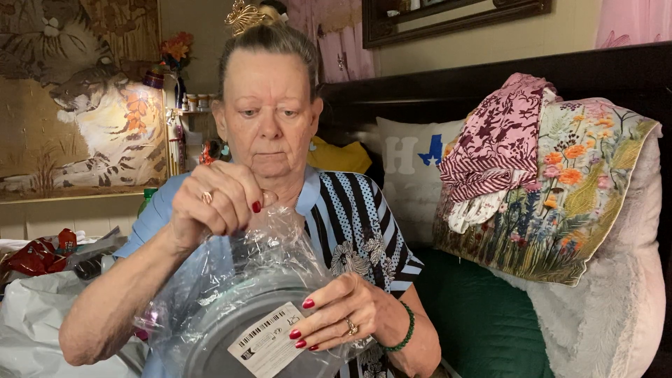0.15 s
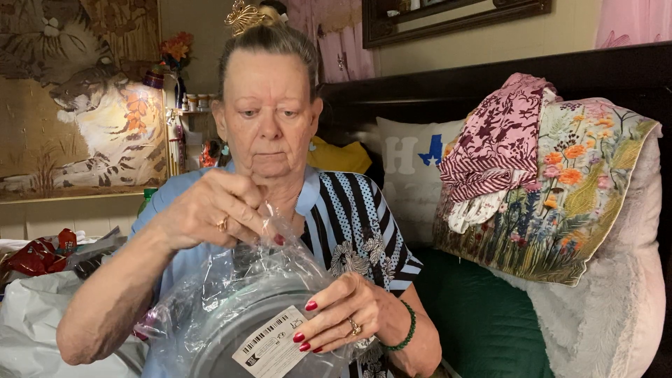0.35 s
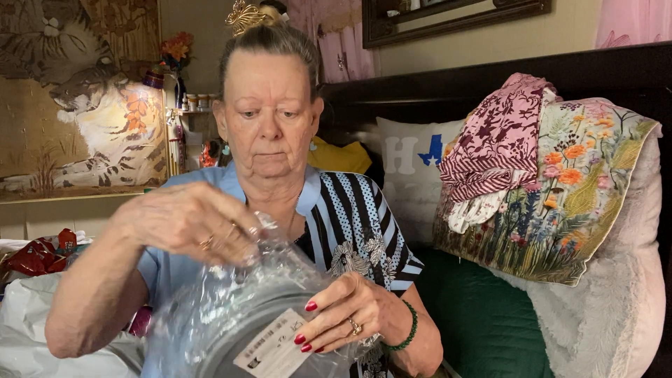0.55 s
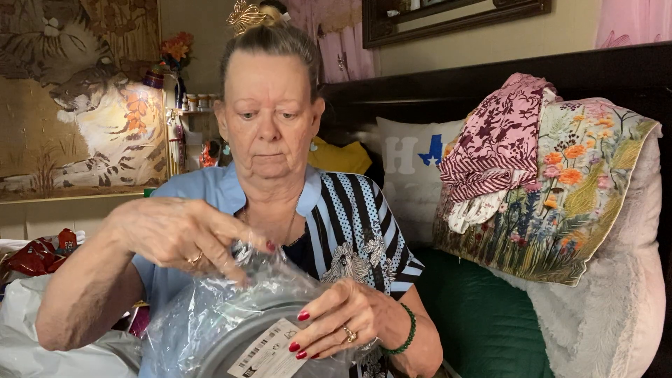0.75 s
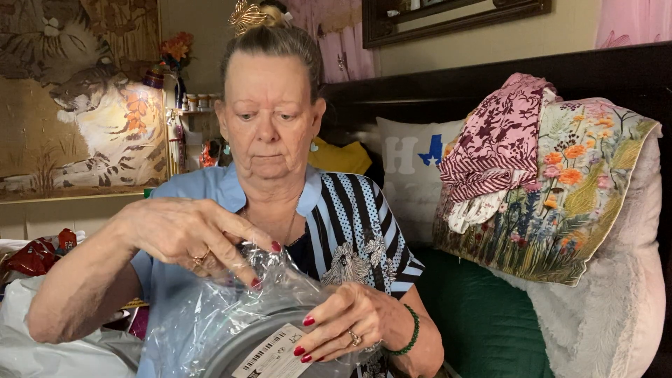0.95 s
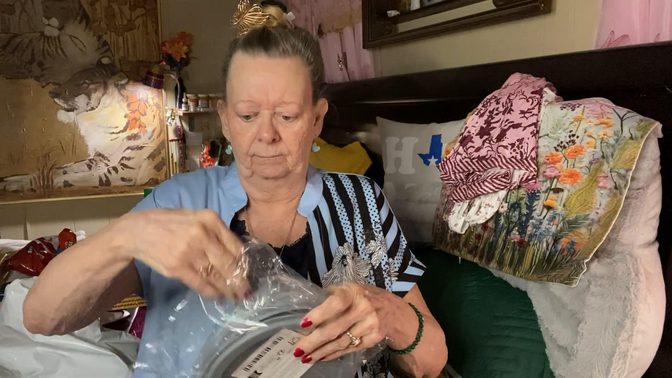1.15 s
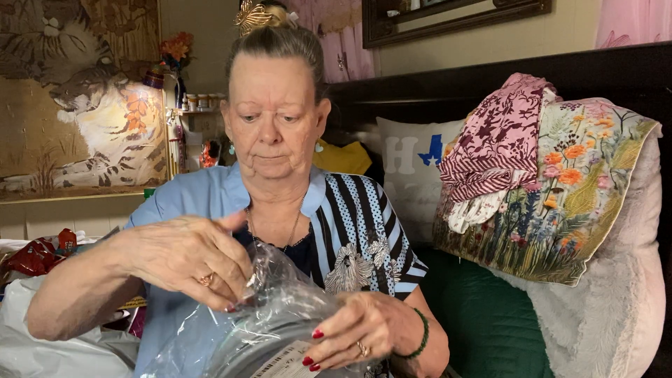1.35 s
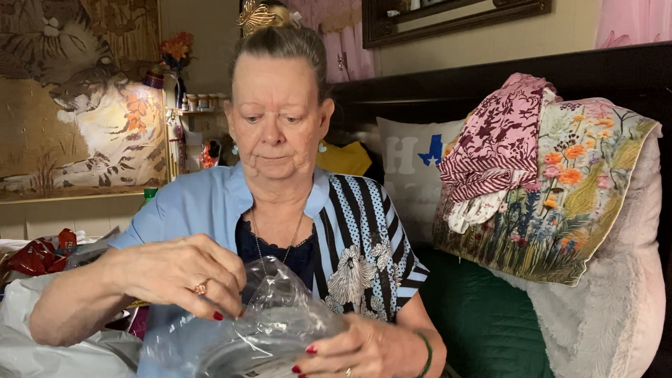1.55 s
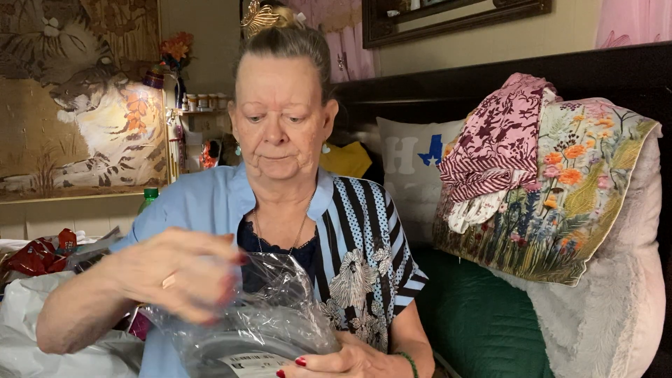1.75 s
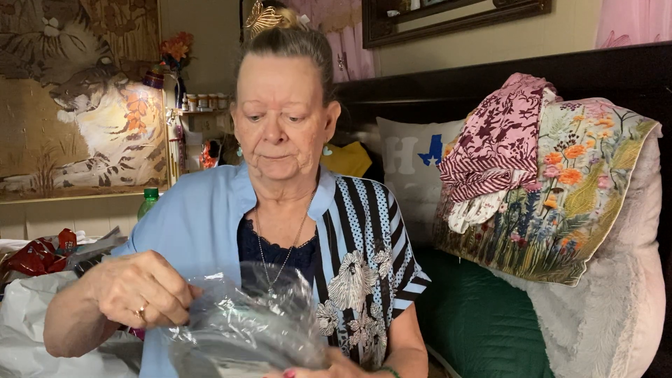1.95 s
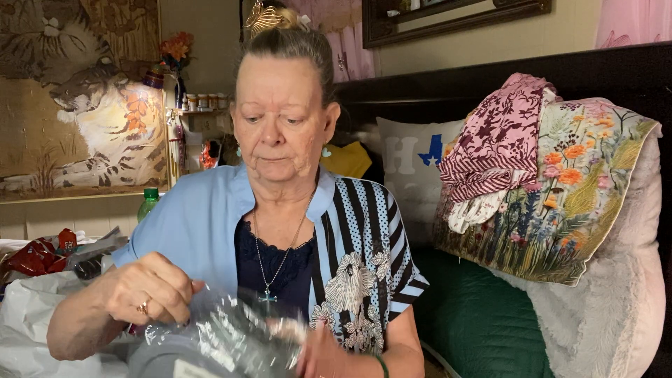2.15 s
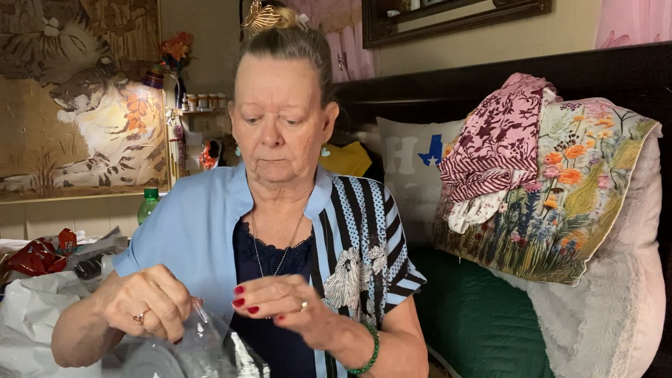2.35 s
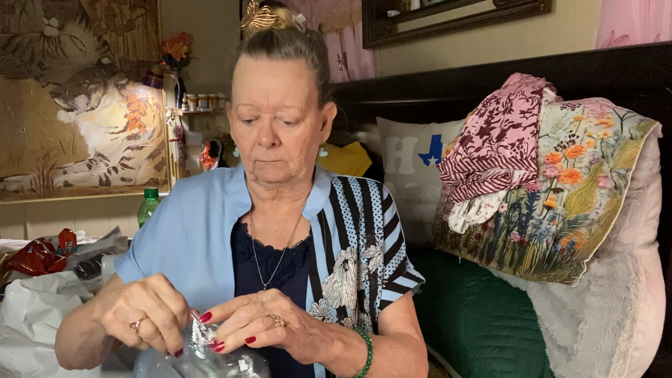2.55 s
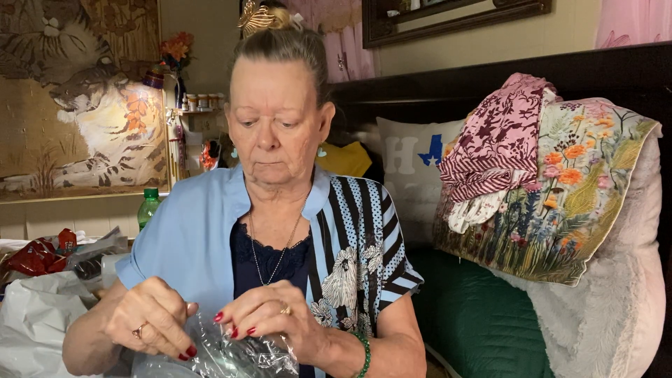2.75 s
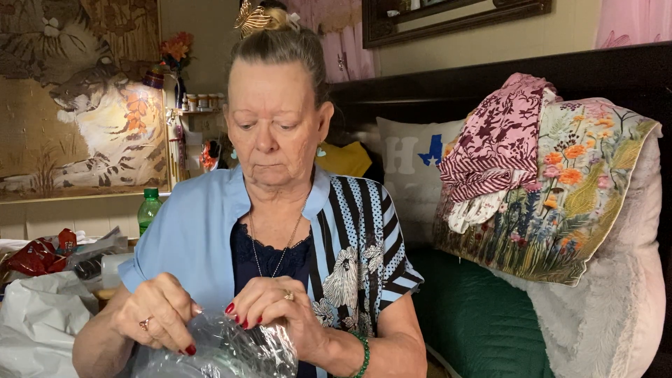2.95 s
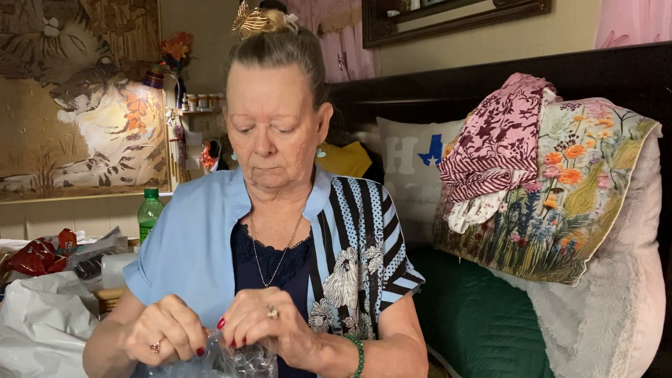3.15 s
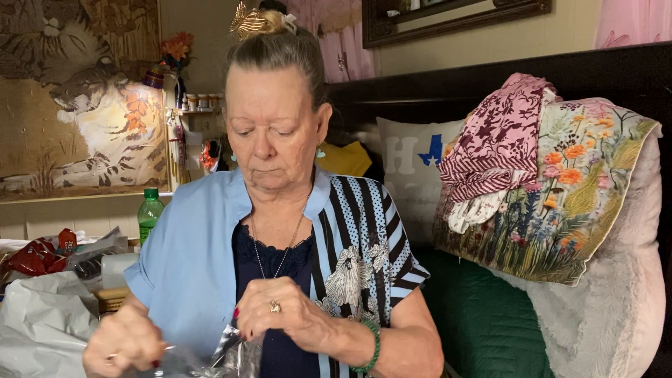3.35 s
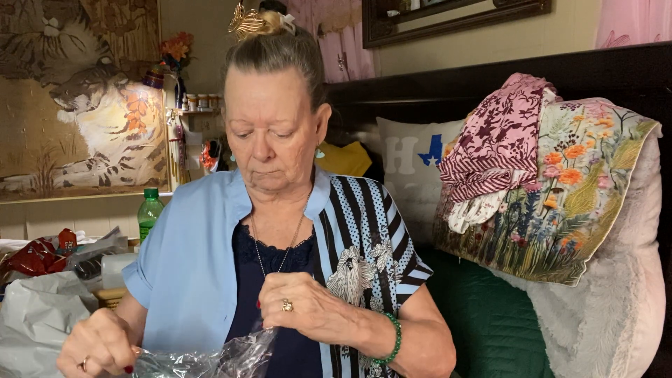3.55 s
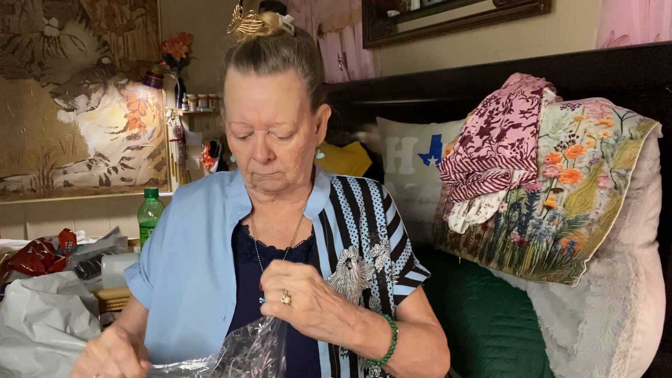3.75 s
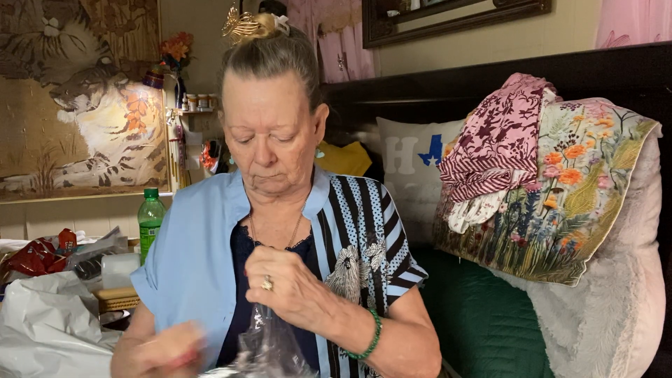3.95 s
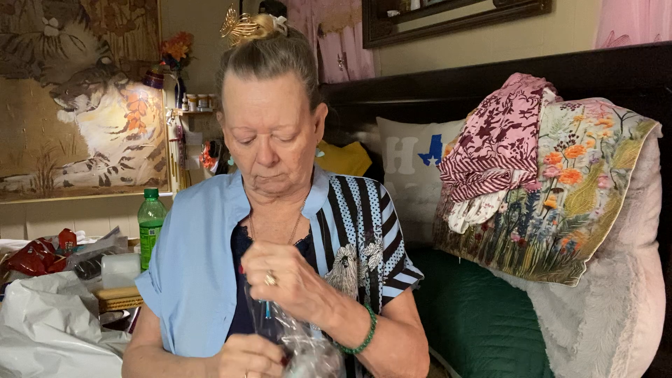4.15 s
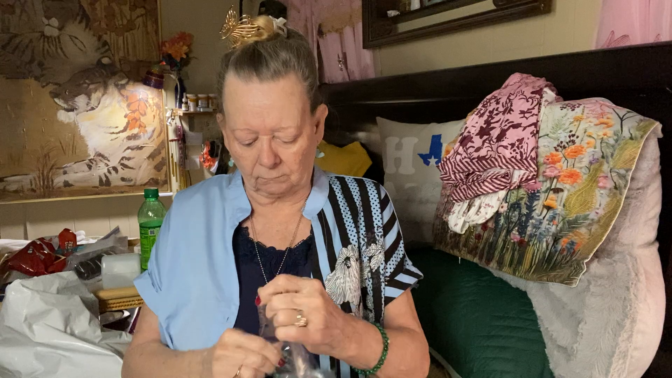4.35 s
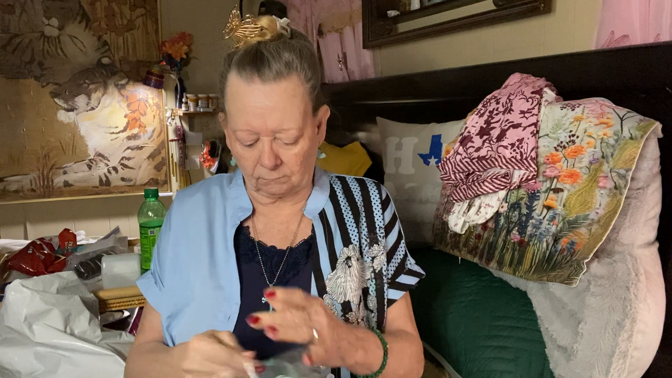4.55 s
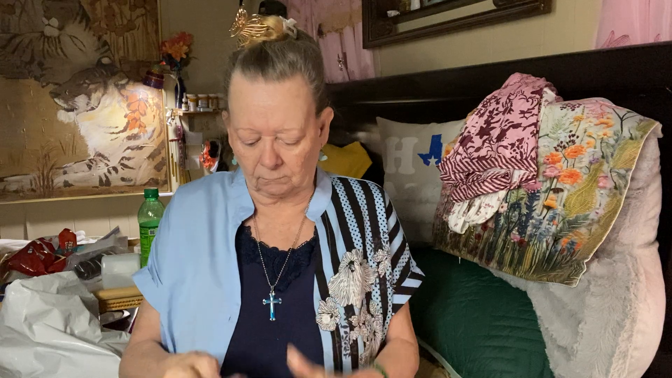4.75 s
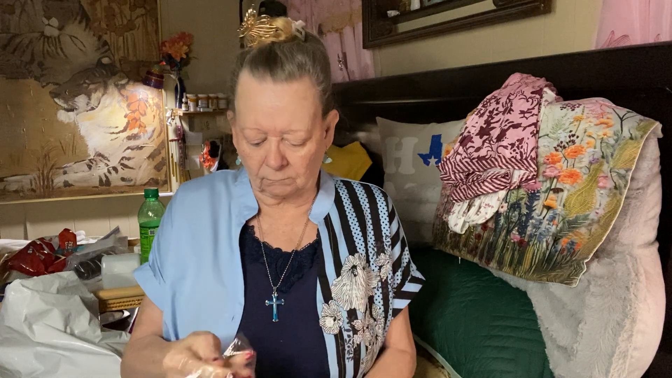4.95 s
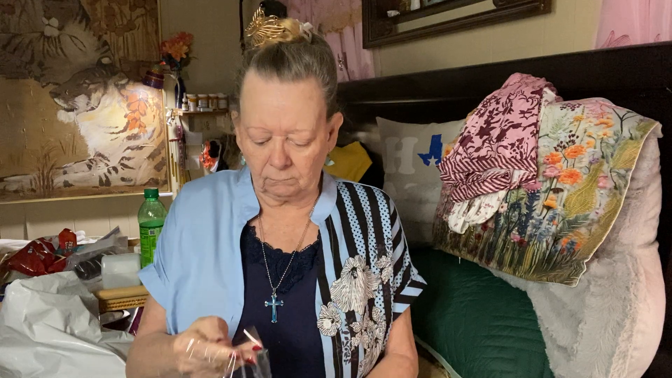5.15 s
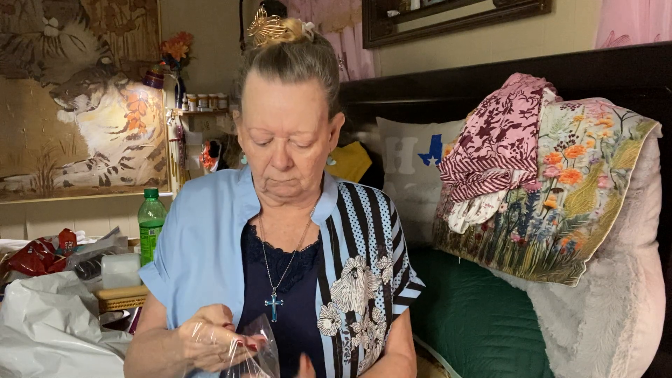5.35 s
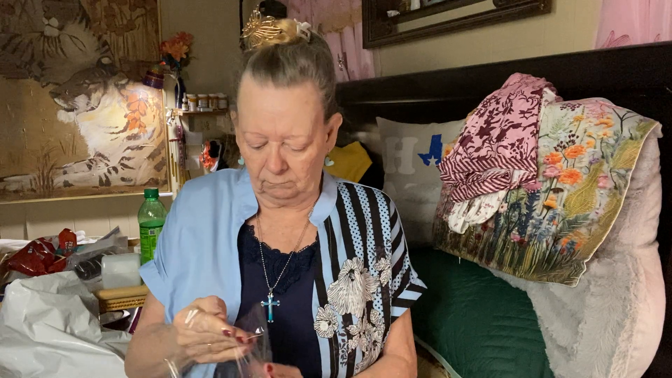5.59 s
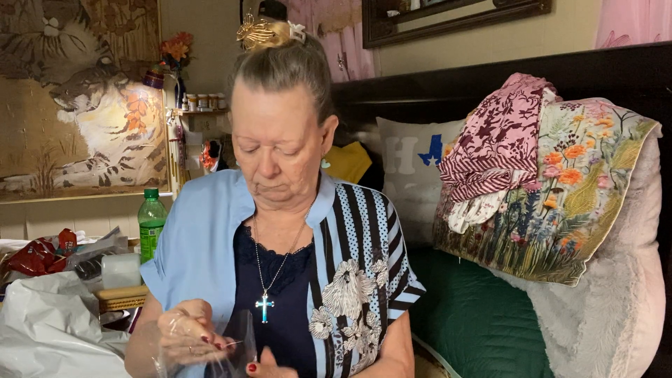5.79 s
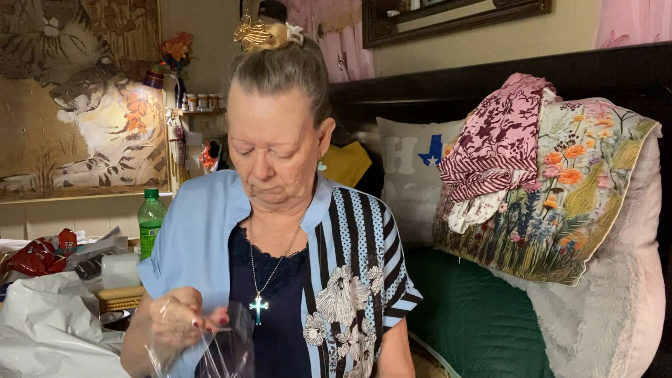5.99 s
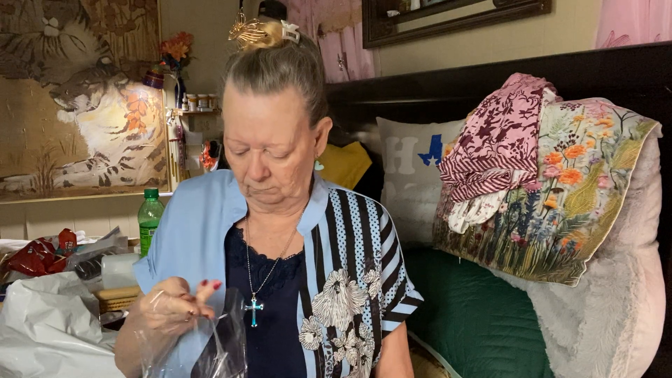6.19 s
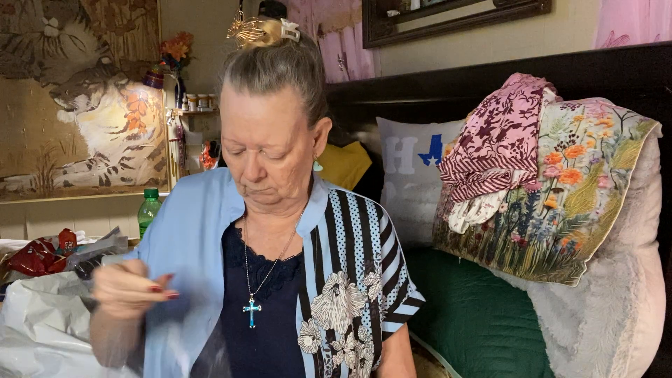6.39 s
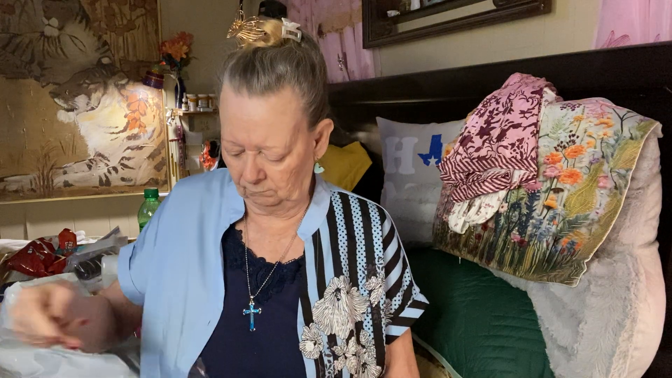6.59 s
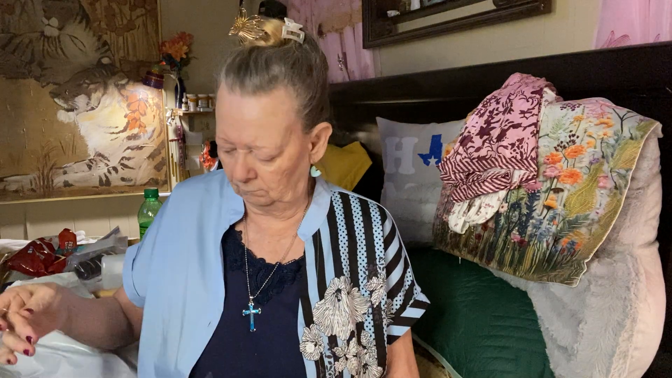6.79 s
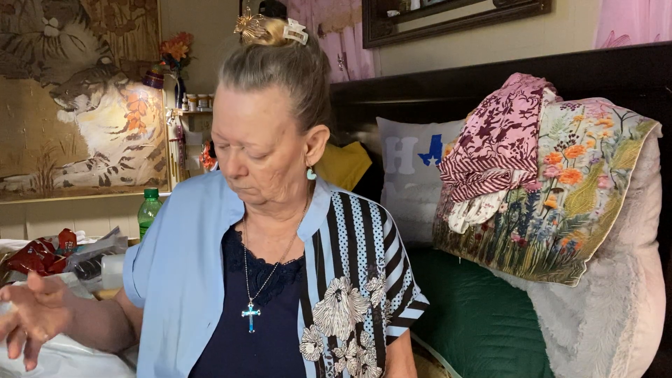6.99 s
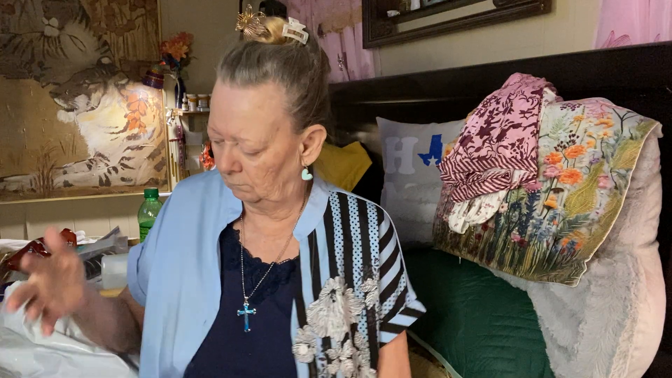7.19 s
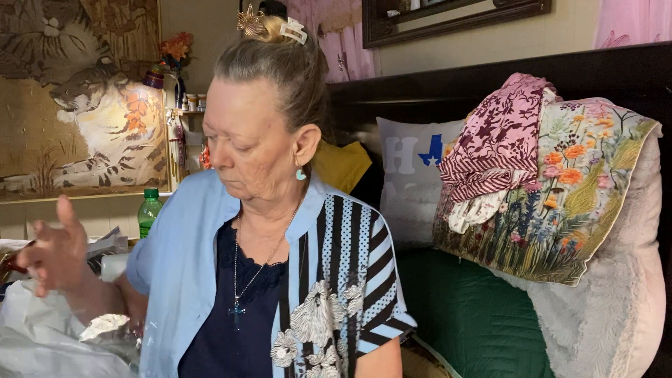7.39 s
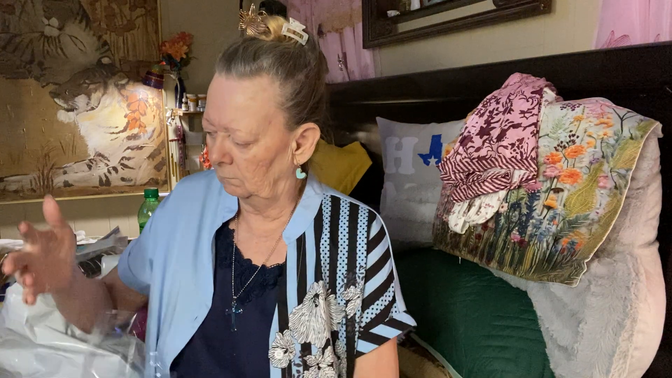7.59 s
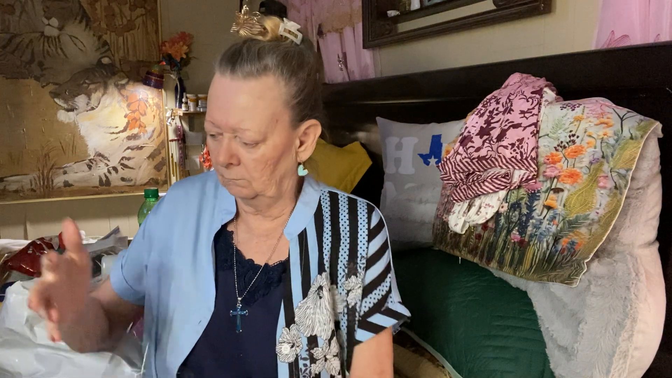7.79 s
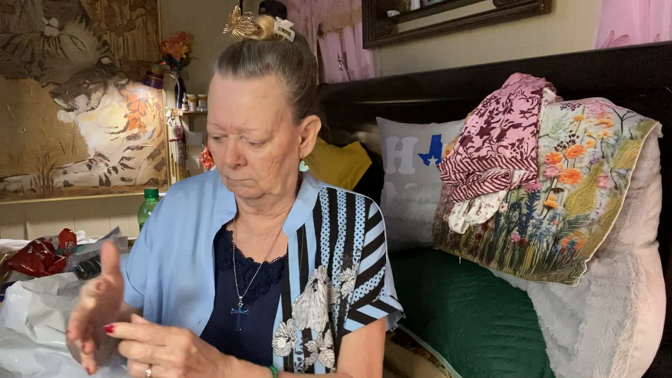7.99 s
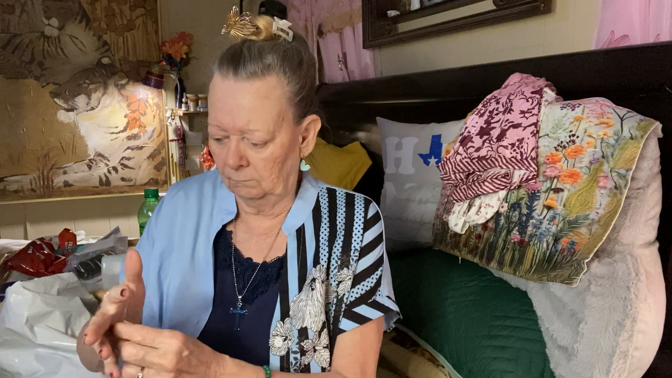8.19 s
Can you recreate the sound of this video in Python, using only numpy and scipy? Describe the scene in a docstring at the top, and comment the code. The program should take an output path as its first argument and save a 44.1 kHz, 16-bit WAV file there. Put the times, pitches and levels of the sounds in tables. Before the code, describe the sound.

Hands work crinkly plastic packaging with dense crackles and sharp snaps, soft thuds as contents are set down, one more loud crackle, then faint rustling.

```python
"""In a small furnished room, a phone lies close to a thin, stiff plastic bag, over quiet noise and faint mains hum.
From the start hands work it open: clicks swarm, ringing folds, slack sheet and air pocket, as cloth rubs dully.
Single creases snap in short noise bursts, panels knock hollowly, taut film rings and a gliding tone squeaks.
As the bag comes off, its contents are set down softly in low, damped thuds.
Then the bag crackles loudly once more, with knocks, before it rustles faintly to the end."""
import sys
import numpy as np
from scipy import signal
from scipy.fft import rfft, irfft, next_fast_len
from scipy.io import wavfile
from scipy.ndimage import uniform_filter1d, map_coordinates

SR = 44100
rng = np.random.default_rng(int(sys.argv[2]) if len(sys.argv) > 2 else 0)


def digitize_waveform(pressure):
    """Quantize a signal to 16-bit integers and store it at the path in sys.argv[1].

    Rows of a 2-D input are taken as channels; values are limited to [-1, 1].
    """
    field = np.atleast_2d(pressure).T
    bounded = np.clip(field, -1, 1)
    quanta = np.round(bounded * 32767).astype(np.int16)
    wavfile.write(sys.argv[1], SR, quanta)


N = 362943

# All levels in the tables are relative, before the balance of the mix.
# Quiet room air. Each row: frequency in Hz, density in dB per Hz.
AIR_COLOUR = [(20, -43), (55, 10), (90, -5), (150, -5), (300, -6.5), (600, -16.5), (1600, -6.5),
              (6500, -15), (10000, -34), (15000, -43)]
# Mains hum. Each row: frequency in Hz, level in dB.
MAINS_HUM = [(59.5, -85.5), (119, -81)]
# Grips and pulls of the hands. Each row: start in seconds, rise in seconds, hold in seconds,
# creases in dB, air pocket in dB over the creases, slack sheet in dB over the creases.
STROKES = [(-0.017, 0.014, 0.154, -47.0, -7, -12), (0.099, 0.047, 0.009, -45.0, -4.5, -14),
           (0.22, 0.05, 0.117, -46.5, -4.5, -8), (0.455, 0.014, 0.155, -44.5, -6.5, -12),
           (0.658, 0.034, 0.016, -36.5, -8.5, -12.5), (0.728, 0.027, 0.103, -43.0, -7.5, -13),
           (0.854, 0.157, 0.081, -45.0, -17, -25.5), (1.097, 0.04, 0.039, -43.0, -15.5, -24.5),
           (1.188, 0.018, 0.149, -50.0, -17.5, -29), (1.398, 0.036, 0.068, -41.0, -18, -23.5),
           (1.523, 0.036, 0.073, -45.0, -19, -20), (1.657, 0.039, 0.005, -47.0, -18, -20),
           (1.833, 0.006, 0.025, -64, -4.5, -14), (1.862, 0.035, 0.008, -39.0, -18.5, -24),
           (1.898, 0.06, 0.23, -44.5, -19.5, -23.5), (2.055, 0.015, 0.025, -45, -32, -33),
           (2.152, 0.011, 0.009, -52.0, -10, -21), (2.206, 0.014, 0.031, -48.0, -21, -41),
           (2.303, 0.04, 0.065, -48.0, -18, -18), (2.427, 0.054, 0.004, -50.0, -16, -41),
           (2.509, 0.02, 0.168, -47.0, -16.5, -27), (2.574, 0.014, 0.026, -54.0, -8, -6),
           (2.709, 0.056, 0.123, -48.0, -18, -23), (2.808, 0.186, 0.196, -42.0, -20, -17.5),
           (3.13, 0.096, 0.08, -40.0, -12, -15), (3.3, 0.026, 0.04, -32.5, -24, -16),
           (3.359, 0.125, 0.025, -32.5, -17, -15.5), (3.58, 0.17, 0.105, -47.0, -13, -16),
           (3.864, 0.02, 0.092, -48.0, -18.5, -28), (3.975, 0.12, 0.19, -45.5, -19, -20.5),
           (4.187, 0.006, 0.066, -44.0, -19, -19), (4.282, 0.029, 0.005, -37.0, -8, -20.5),
           (4.348, 0.029, 0.022, -33.5, -14.5, -14.5), (4.446, 0.055, 0.043, -46.0, -14.5, -19.5),
           (4.55, 0.027, 0.069, -41.0, -18.5, -22.5), (4.708, 0.028, 0.071, -31.0, -15, -17.5),
           (4.81, 0.095, 0.025, -32.0, -15, -15.5), (5.005, 0.032, 0.097, -48.0, -9, -14.5),
           (5.171, 0.05, 0.034, -48.0, -15, -16.5), (5.319, 0.05, 0.079, -61.0, -10, -16),
           (5.465, 0.042, 0.004, -44.5, -5, -12), (5.529, 0.015, 0.138, -50.0, -17, -16),
           (5.726, 0.013, 0.135, -55.5, -14.5, -18), (5.89, 0.016, 0.276, -50.0, -10, -18),
           (6.122, 0.054, 0.092, -43.0, -14.5, -18), (6.27, 0.04, 0.097, -34.0, -12.5, -14),
           (6.444, 0.035, 0.031, -43.0, -8, -15), (6.566, 0.027, 0.07, -62.5, -10, -13.5),
           (6.791, 0.056, 0.029, -66.0, -7.5, -25), (6.92, 0.06, 0.236, -63.5, -12, -19),
           (7.188, 0.09, 0.1, -58.5, -11.5, -18.5), (7.363, 0.046, 0.035, -43.0, -8, -12),
           (7.454, 0.023, 0.139, -52.0, -13.5, -19), (7.632, 0.02, 0.04, -53, -3.5, -12.5),
           (7.723, 0.042, 0.204, -66.5, -4.5, -16.5), (8.04, 0.07, 0.073, -61.5, -7, -11.5)]
# Colour of the crackling film. Each row: frequency in Hz, density in dB per Hz.
FILM_COLOUR = [(60, -30), (300, -5.5), (500, -21), (700, 1.5), (950, -3.5), (1700, 2), (2700, -4.5),
               (4300, 0), (6500, 0.5), (9000, -1.5), (10500, -5), (13500, -8.5), (15000, -28), (16500, -30)]
# Slack sheet, lower as a wider span hangs free. Each row: time in seconds, resonance in Hz.
SPAN_PITCH = [(0, 503), (.8, 502), (1.4, 530), (2.35, 587), (2.65, 502), (3.1, 445), (3.2, 490),
              (3.38, 463), (3.5, 520), (3.85, 480), (4.3, 620), (4.8, 533), (6.3, 532), (8.23, 490)]
# Sharp peak and broad hump of the sheet. Each row: multiple of its resonance,
# nominal width over that resonance, level in dB.
SHEET_MODES = [(1, 0.067, 5.5), (1, 0.31, 7.5)]
# Air inside the bag, before its tuning shifts. Each row: frequency in Hz, nominal width in Hz, level in dB.
POCKET_MODES = [(960, 63.5, -5.5), (824, 45, -10.5)]
# Arms and contents sliding on lap and bedding. Each row: start in seconds, rise in seconds,
# hold in seconds, level in dB.
SLIDES = [(-.02, 0.021, 0.2, -72), (0.246, 0.07, 0.027, -59), (0.452, 0.062, 0.058, -67.5),
          (1.247, 0.044, 0.042, -73.5), (2.746, 0.52, .2, -73), (3.25, 0.2, 0.098, -62.5),
          (3.745, .03, .08, -72), (4.17, .03, 0.18, -71), (4.725, 0.084, 0.17, -65),
          (5.045, 0.046, 0.32, -68.5), (5.32, 0.057, 0.12, -57), (5.51, 0.058, 0.68, -72),
          (6.11, 0.052, 0.04, -67), (6.263, 0.11, 0.043, -61.5), (7.357, 0.062, 0.03, -66),
          (7.945, 0.19, 0.11, -74.5)]
# Dull colour of that sliding. Each row: frequency in Hz, density in dB per Hz.
CLOTH_COLOUR = [(20, -51), (70, -34), (110, -3.5), (155, -5), (240, 2.5), (340, -12), (600, -16),
                (2000, -76)]
# Swings of the bag that push air at the microphones. Each row: start in seconds, rise in seconds,
# hold in seconds, level in dB.
SWINGS = [(-.1, 0.51, 0.32, -64.5), (1.847, .04, 0.048, -60.5), (2.5, 0.099, .5, -78),
          (3.05, 0.28, 0.05, -65.5), (4.25, 0.067, 0.28, -71), (4.73, 0.13, 0.1, -56.5),
          (4.954, 0.26, 0.47, -64), (6.15, 0.21, 0.046, -59.5), (7.37, 0.051, 0.036, -63)]
# Colour of the draught. Each row: frequency in Hz, density in dB per Hz.
DRAUGHT_COLOUR = [(15, -26), (35, -13), (60, -4), (90, -9.5), (140, -10), (400, -55)]
# Single creases that snap through. Each row: time in seconds, level in dB, pitch in Hz.
SNAPS = [(0.1136, -28, 6080), (0.153, -25.5, 6480), (0.234, -31, 6750), (0.2987, -23.5, 6820),
         (0.3257, -25.5, 5250), (0.468, -28.5, 4570), (0.6574, -26, 4300), (0.6836, -17.5, 5800),
         (0.693, -21, 6230), (0.756, -26, 5950), (0.8756, -25, 4320), (0.9877, -30, 6500),
         (1.04, -26.5, 5500), (1.1462, -27.5, 5900), (1.169, -34.5, 6000), (1.213, -27, 5400),
         (1.433, -21.5, 4350), (1.6916, -32, 6170), (1.838, -51, 4500), (1.854, -49, 6100),
         (1.8866, -23, 5040), (1.9, -24, 5040), (1.9922, -28, 6410), (1.9958, -21, 6900),
         (2.0302, -22, 6660), (2.049, -36, 2600), (2.0655, -30, 5000), (2.075, -28, 4800),
         (2.0865, -32, 5170), (2.1653, -31, 4770), (2.174, -30, 5500), (2.222, -26.5, 6260),
         (2.2502, -27.5, 4940), (2.286, -24.5, 5570), (2.343, -30.5, 4990), (2.355, -33.5, 4590),
         (2.4774, -29, 4680), (2.585, -30, 6500), (2.603, -28.5, 4290), (2.715, -38, 7000),
         (2.7852, -28.5, 5480), (2.805, -39, 6500), (2.8743, -24.5, 5730), (2.9066, -26.5, 6760),
         (2.9824, -20.5, 5170), (3.0586, -22.5, 4260), (3.1102, -24.5, 5060), (3.187, -23.5, 5000),
         (3.23, -18, 6070), (3.299, -19, 7500), (3.3192, -16, 9110), (3.4481, -17, 4800),
         (3.4664, -12, 4260), (3.5034, -14.5, 5000), (3.509, -14.5, 5640), (3.5163, -22, 5230),
         (3.5267, -14.5, 7250), (3.634, -32, 4800), (3.749, -31, 6630), (3.7888, -30.5, 5300),
         (3.8074, -28, 8300), (3.839, -32, 6360), (3.943, -33, 6200), (4.025, -42, 6500),
         (4.073, -27.5, 4710), (4.187, -18.5, 5500), (4.1923, -17.5, 4460), (4.287, -30, 6500),
         (4.298, -24.5, 2200), (4.316, -20, 5430), (4.3585, -18.5, 4150), (4.364, -22, 5000),
         (4.38, -19, 5500), (4.391, -17, 4700), (4.41, -23, 6000), (4.421, -26, 5000), (4.5043, -21, 5400),
         (4.578, -22.5, 4680), (4.618, -30.5, 6000), (4.689, -31, 6000), (4.704, -28, 6000),
         (4.715, -22, 4710), (4.73, -14.5, 4800), (4.8005, -30, 4870), (4.872, -17.5, 5500),
         (5.037, -18, 8550), (5.217, -29, 6030), (5.221, -27, 8050), (5.272, -36, 6500), (5.36, -50, 5500),
         (5.41, -40, 4530), (5.5052, -22, 6640), (5.6, -29, 4600), (5.658, -40, 5000), (5.684, -30.5, 6350),
         (5.7428, -36, 1700), (5.753, -42, 5500), (5.764, -36.5, 2000), (5.864, -34.5, 5500),
         (5.899, -35, 4800), (6.096, -29.5, 2420), (6.146, -35, 6230), (6.18, -21.5, 6230),
         (6.287, -20, 4170), (6.325, -23.5, 4500), (6.508, -26.5, 5700), (6.615, -43, 5500),
         (6.692, -44, 5000), (6.759, -53, 5500), (6.816, -58, 3000), (6.851, -48, 5000),
         (6.872, -46.5, 2700), (6.916, -50, 7500), (6.932, -36.5, 7100), (6.986, -51, 4500),
         (7.03, -45, 6500), (7.038, -43, 6000), (7.092, -45, 4800), (7.1317, -38.5, 3980),
         (7.251, -37.5, 6000), (7.3187, -34, 6680), (7.351, -37, 6000), (7.546, -37, 5500),
         (7.582, -33.5, 4310), (7.647, -36.5, 1590), (7.663, -34, 5580), (7.719, -39, 5500),
         (7.785, -43.5, 3500), (7.842, -48.5, 5480), (7.899, -44.5, 6200), (7.98, -50, 6000),
         (8.045, -41.5, 6540), (8.15, -40.5, 5920), (8.175, -41, 6170)]
# Panels that flip with a hollow knock. Each row: time in seconds, level in dB, pitch in Hz.
POPS = [(0.506, -36, 920), (0.686, -34, 944), (2.567, -45, 940), (3.227, -46, 464), (3.501, -24, 1840),
        (4.767, -30, 1630), (4.799, -30, 1380), (4.804, -43, 485), (5.504, -43, 1530), (4.926, -36, 920),
        (6.289, -32.5, 527), (6.318, -36.5, 534), (6.361, -32, 718), (6.387, -35, 513), (6.411, -39.5, 460)]
# Film drawn taut. Each row: start in seconds, rise in seconds, hold in seconds, level in dB, resonance in Hz.
TAUT_GRIPS = [(1.818, .016, .012, -65, 1330), (3.176, 0.14, .03, -49, 1615),
              (3.363, 0.047, 0.025, -49, 1830), (3.578, .015, .02, -62, 1750),
              (3.687, 0.041, 0.024, -62, 2040), (3.87, 0.025, 0.029, -60.5, 2050),
              (4.304, 0.03, 0.1, -51.5, 1430), (4.723, 0.047, 0.083, -47.5, 1650),
              (5.473, 0.032, .003, -49, 1980), (6.27, 0.034, 0.027, -49, 1670),
              (7.64, .008, 0.033, -56, 1400)]
# Film dragging over the contents. Each row: time in seconds, mean pitch in Hz, level in dB.
SQUEAK_GLIDE = [(3.405, 4520, -68), (3.425, 4850, -36), (3.45, 4920, -42), (3.461, 4600, -45),
                (3.468, 4230, -39), (3.474, 4200, -65)]
# Contents set down. Each row: time in seconds, peak in dB.
BUMPS = [(5.221, -52.5), (5.283, -56), (5.346, -52), (5.371, -39.5), (5.451, -44)]
# What a bump rings with. Each row: mean frequency in Hz, level in dB, 60 dB decay in seconds.
THUD_MODES = [(73, -27, 0.066), (153.7, -2, 0.14), (188, -5, 0.06), (236, -8, 0.044), (327, -4, 0.043)]
# Decay of the furnished room. Each row: frequency in Hz, 60 dB decay in seconds.
ROOM_DECAY = [(200, 0.21), (1500, 0.2), (6000, 0.22), (14000, 0.064)]
# Colour of the room's answer. Each row: frequency in Hz, level in dB.
ROOM_COLOUR = [(300, -1.5), (2000, 3), (4500, 2.5), (8000, 2), (13000, 0.5)]
# Likeness of the two microphones. Each row: frequency in Hz, left-right likeness from -1 to 1.
MIC_LIKENESS = [(200, .6), (450, .9), (900, .85), (1100, .5), (1500, .8), (2100, .75), (2900, .2),
                (3500, .2), (4200, .7), (5200, .2), (6300, .6), (7100, .6), (7700, .2), (8500, .66),
                (9500, .82), (10400, .98), (11300, .77), (12200, .75), (13000, .96), (14200, .6)]
# Balance of the two microphones. Each row: frequency in Hz, left minus right in dB.
MIC_BALANCE = [(300, 0.5), (2000, 1), (3600, 4), (5300, 7), (6300, 4), (8000, 5), (10000, -0.5)]
# Timing of the two microphones. Each row: frequency in Hz, lead of the left in radians.
MIC_LEAD = [(400, -7.3), (500, -6.3), (570, -5.2), (800, -4.1), (1000, -2.1), (1100, -1.4), (1500, .6),
            (2000, 1.1), (2600, .6), (3100, -1.6), (3500, -.2), (4400, -.2), (5000, -1.4), (5400, -3.4),
            (6000, -6), (7000, -7.5), (7600, -7.7), (8000, -5.8), (8700, -5.5), (10400, -3.2),
            (11000, -2.8), (12000, -1.2), (12500, -.1), (13600, .1), (14600, 2.9)]
# While the bag is held at the chest. Each row: frequency in Hz, further lead of the left in radians.
RAISED_LEAD = [(300, -0.5), (570, -2), (950, -4.5), (1150, 0)]

SAG_DB_PER_S, RELEASE_DB_PER_S = 20.5, 275  # a movement eases off while held, then stops quickly
CREASE_DB, FOLD_DB, POCKET_DB, SHEET_DB = 2, -4, 1.5, 3  # how strongly each part answers a stroke
FOLD_SHARE = 0.28  # share of a stroke's air pocket emphasis, in dB, that the broad folds take on
POCKET_FULL, POCKET_EMPTY, EMPTYING_S = 0.96, 1.032, 2.96  # tuning factors, first and last; time between
STIR_DB = -80.5  # mean level of the arms' constant faint draught
TAUT_WIDTH = 0.18  # width of each taut film filter over its pitch
LOWERED_S, LOWERING_S = 3.1, 0.033  # when the bag sinks towards the lap; time this takes
TOP_HZ = 15900


def amp(db):
    """Decibels to gain."""
    return 10 ** (np.asarray(db) / 20)


def unit(x):
    """Scale a signal to rms 1."""
    return x / np.sqrt(np.mean(x ** 2) + 1e-20)


def along(points, hz):
    """Read (Hz, value) points on a log frequency axis."""
    f, v = np.transpose(points)
    return np.interp(np.log(hz + 1), np.log(f + 1), v)


def curves(rows):
    """Give one value per sample for each column after the time."""
    s, *cols = np.transpose(rows)
    return [np.interp(np.arange(N) / SR, s, c) for c in cols]


def wobble(rate):
    """Draw a smooth random curve with rate knots a second."""
    knots = rng.standard_normal(int(N * rate / SR) + 4)
    return map_coordinates(knots, [np.arange(N) * rate / SR])


def filtered(x, response):
    """Multiply the spectrum of x by a response of frequency."""
    m = next_fast_len(N + SR // 2, True)
    return irfft(rfft(x, m) * response(np.fft.rfftfreq(m, 1 / SR)), m)[..., :N]


def coloured(x, gain, size=2048):
    """Pass x through the causal, minimum-phase filter with this gain over frequency."""
    log_gain = np.log(np.maximum(gain(np.fft.rfftfreq(size, 1 / SR)), 1e-6))
    cepstrum = irfft(log_gain)
    cepstrum[1:size // 2] *= 2
    cepstrum[size // 2 + 1:] = 0
    impulse = irfft(np.exp(rfft(cepstrum)))
    return signal.oaconvolve(x, impulse[None], axes=1)[:, :N]


def steadied(x, span):
    """Hold the rms of x near 1 over span seconds; single clicks still stand out."""
    size = max(int(span * SR), 2)
    power = uniform_filter1d(uniform_filter1d(np.mean(x ** 2, axis=0), size), size)
    return x / np.sqrt(np.abs(power) + 1e-4 * np.mean(power))


def resonant(x, modes):
    """Ring x through a few (Hz, width, dB) resonances with steep skirts."""
    def one(f, hz, width):
        return (1j * f * width / (hz * hz - f * f + 1j * f * width)) ** 2
    return filtered(x, lambda f: sum(amp(db) * one(f, hz, 2 * width) for hz, width, db in modes))


def gesture(start, rise, hold, sag=SAG_DB_PER_S, release=RELEASE_DB_PER_S, size=32):
    """Power of one hand movement, every size samples: it builds, sags while held and dies away."""
    age = np.arange(0, N, size) / SR - start
    held = np.maximum(age - rise, 0)
    fall_db = sag * held + release * np.maximum(held - hold, 0)
    build = np.clip(age / max(rise, 1e-3), 0, 1)
    return (build * amp(-np.minimum(fall_db, 200))) ** 2


def movements(timing, levels_db):
    """Gain per sample of (start, rise, hold) movements at these levels; overlaps add in power."""
    power = amp(levels_db) ** 2 @ np.array([gesture(*row) for row in timing])
    return np.interp(np.linspace(0, 1, N), np.linspace(0, 1, len(power)), np.sqrt(power))


def background():
    """Still room air is coloured noise; the faint mains hum is sines of wavering level."""
    air = unit(filtered(rng.standard_normal((2, N)), lambda hz: amp(along(AIR_COLOUR, hz))))
    t = np.arange(N) / SR
    hum = sum(np.sqrt(2) * amp(db + 1.2 * wobble(12)) * np.sin(2 * np.pi * hz * t)
              for hz, db in MAINS_HUM)
    return amp(-73.0) * air + amp(-8.5) * hum


def clicks(effort_db, crowding, spread_db, clump_db, life, rise, ring, count=10000, size=128):
    """Each buckling crease cracks and rings a few cycles at its own pitch; harder work buckles more."""
    due = np.cumsum(amp(crowding * effort_db))
    start = np.minimum(np.searchsorted(due, rng.random(count) * due[-1]), N - 1)
    # one crease sets off its neighbours, so strong clicks come in clumps of a few milliseconds
    strength_db = spread_db * np.minimum(rng.standard_normal(count), 2) + clump_db * wobble(170)[start]
    t = np.arange(size) / SR
    age = t / (life * np.exp(.5 * rng.standard_normal((count, 1))))  # in lifetimes
    fade = np.exp(-age) * (1 - np.exp(-age / rise))
    pitch_hz = rng.uniform(0, SR / 3, (count, 1))
    tone = np.sin(2 * np.pi * (pitch_hz * t + rng.random((2, count, 1))))
    noise = rng.standard_normal((2, count, size))
    grains = amp(strength_db)[:, None] * fade * (noise + ring * tone)
    where = (start[:, None] + np.arange(size)).ravel()
    return np.array([np.bincount(where, g.ravel(), N + size)[:N] for g in grains])


def sheet(swarm, count=7):
    """The clicks ring the slack sheet, whose resonance glides between neighbouring tunings."""
    span_hz, = curves(SPAN_PITCH)
    lowest_hz, step = 390, 1.09
    place = np.clip(np.log(span_hz / lowest_hz) / np.log(step), 0, count - 1)
    out = np.zeros((2, N))
    for k in range(count):
        hz = lowest_hz * step ** k
        ring = resonant(swarm, [(hz * ratio, hz * width, db) for ratio, width, db in SHEET_MODES])
        out += ring * np.maximum(1 - np.abs(place - k), 0)
    return out


def pocket(swarm):
    """The clicks ring the air in the bag, whose pitch rises a little as the bag collapses."""
    def tuned(factor):
        return resonant(swarm, [(hz * factor, width, db) for hz, width, db in POCKET_MODES])
    collapsed = np.clip(np.arange(N) / SR / EMPTYING_S, 0, 1) ** 2
    return (1 - collapsed) * tuned(POCKET_FULL) + collapsed * tuned(POCKET_EMPTY)


def crackle(settling_db=-80):
    """Each stroke sets off clicks that sound in creases, folds, slack sheet, air pocket and taut film."""
    rows = np.array(STROKES)
    timing, (level_db, pocket_db, sheet_db) = rows[:, :3], rows[:, 3:].T
    effort = movements(timing, level_db) + amp(settling_db)
    swarm = clicks(20 * np.log10(effort), crowding=.5, spread_db=7.0, clump_db=0.5,
                   life=0.00023, rise=0.19, ring=1.21, count=10000)

    def above(hz, edge_hz):
        return 1 / np.sqrt(1 + (edge_hz / (hz + 1)) ** 10)

    def crease_gain(hz):
        return amp(along(FILM_COLOUR, hz)) * above(hz, edge_hz=2590)

    def fold_gain(hz):
        below = np.sqrt(1 - above(hz, edge_hz=2120) ** 2)
        return amp(along(FILM_COLOUR, hz)) * above(hz, edge_hz=1208) ** 2 * below

    creases, folds = coloured(swarm, crease_gain), coloured(swarm, fold_gain)
    fold_level = movements(timing, level_db + FOLD_SHARE * pocket_db + FOLD_DB)
    sheet_level = movements(timing, level_db + sheet_db + SHEET_DB)
    pocket_level = movements(timing, level_db + pocket_db + POCKET_DB)
    bag = amp(CREASE_DB) * effort * steadied(creases, span=0.022)
    bag += fold_level * steadied(folds, span=0.021)
    bag += sheet_level * steadied(sheet(swarm), span=0.032)
    bag += pocket_level * steadied(pocket(swarm), span=0.047)
    return bag + taut(swarm)


def rumble(spectrum, width):
    """Low stereo noise of rms near 1; width is the gain of its side part."""
    mid, side = filtered(rng.standard_normal((2, N)), lambda hz: amp(along(spectrum, hz)))
    return steadied(np.array([mid + width * side, mid - width * side]), span=0.16)


def shifting(rub_db=-19, left_db=2.0):
    """Cloth and contents slide dully, a little with every stroke; moving air blows at the microphones."""
    strokes, slides, swings = np.array(STROKES), np.array(SLIDES), np.array(SWINGS)
    rubbing = movements(strokes[:, :3], strokes[:, 3] + strokes[:, 5] + rub_db)
    cloth = np.hypot(movements(slides[:, :3], slides[:, 3]), rubbing)
    stir = amp(STIR_DB + 3.7 * wobble(4.3))
    draught = np.hypot(movements(swings[:, :3], swings[:, 3]), stir)
    # the draught is stronger at the left microphone
    draught = amp([[left_db], [-left_db]]) * draught
    return cloth * rumble(CLOTH_COLOUR, width=0.9) + draught * rumble(DRAUGHT_COLOUR, width=1.76)


def snaps(life=0.00016, stutter=0.0067, neighbour_db=-23, octaves=0.32, bright_db=1.5, count=4, size=1024):
    """A large crease gives way with one crack, amid smaller cracks just before and after it."""
    out, t, hz = np.zeros((2, N + size)), np.arange(size) / SR, np.fft.rfftfreq(size, 1 / SR)
    for s, db, pitch_hz in SNAPS:
        lags = stutter * rng.exponential(1, (count, 1))
        neighbours = np.exp(-np.abs(t - lags) / life).max(axis=0)
        burst = np.exp(-np.abs(t - .0012) / life) + amp(neighbour_db) * neighbours
        higher = np.log2((hz + 1) / pitch_hz)
        # a snap is strongest at its own pitch; the smaller the crease, the brighter it is
        tilt_db = bright_db * np.clip(higher, -2, 2) * (pitch_hz / 6000)
        peak = .5 + np.exp(-.5 * (higher / octaves) ** 2)
        facet = amp(along(FILM_COLOUR, hz) + tilt_db) * peak
        crack = irfft(rfft(burst * rng.standard_normal((2, size))) * facet)
        # a unit crack carries the energy of 0.4 ms at full height
        crack *= np.sqrt(.0004 * SR) / np.linalg.norm(crack, axis=1, keepdims=True)
        out[:, round(s * SR):][:, :size] += amp(db) * crack
    return out[:, :N]


def pops(rise_cycles=2.1, ring_cycles=5.7, level_db=2):
    """A flipping panel swells and rings for a few cycles, so low ones last longer than high ones."""
    out, t = np.zeros(N + SR), np.arange(SR // 8) / SR
    for s, db, hz in POPS:
        cycles = hz * t
        swell = (1 - np.exp(-(cycles / rise_cycles) ** 2)) * np.exp(-cycles / ring_cycles)
        knock = swell / swell.max() * np.sin(2 * np.pi * cycles)
        out[round(s * SR):][:len(t)] += amp(db + level_db) * knock
    return np.array([out[:N], np.zeros(N)])


def taut(swarm):
    """The clicks ring the stretched film at a middle pitch, set anew for each grip."""
    out = np.zeros((2, N))
    for start, rise, hold, db, hz in TAUT_GRIPS:
        part = slice(round(start * SR), round((start + rise + hold) * SR) + SR // 4)
        b, a = signal.iirpeak(hz, 1 / TAUT_WIDTH, SR)
        ring = signal.lfilter(b, a, signal.lfilter(b, a, swarm[:, part]))
        out[:, part] += movements([(start, rise, hold)], [db])[part] * steadied(ring, span=0.023)
    return out


def squeak(rough=0.0323, rough_per_s=900):
    """The film sticks and slips over the contents: a brief tone with an unsteady pitch."""
    hz, db = curves(SQUEAK_GLIDE)
    t = np.arange(N) / SR
    sounding = (t > SQUEAK_GLIDE[0][0]) & (t < SQUEAK_GLIDE[-1][0])
    unsteady = np.array([wobble(rough_per_s), wobble(rough_per_s)])
    phase = 2 * np.pi * np.cumsum(hz * (1 + rough * unsteady), axis=1) / SR
    return sounding * amp(db) * np.sqrt(2) * np.sin(phase)


def bumps(attack=0.011):
    """Padded contacts: a slow push into a few low, damped modes."""
    out, t = np.zeros(N + SR), np.arange(SR // 4) / SR
    for s, db in BUMPS:
        ring = np.zeros(len(t))
        for hz, level, t60 in THUD_MODES:
            mode_hz = hz * (1 + 0.032 * rng.standard_normal())
            ring += amp(level - 60 * t / t60) * np.sin(2 * np.pi * mode_hz * t)
        ring *= 1 - np.exp(-t / attack)
        out[round(s * SR):][:len(t)] += amp(db) * ring / np.abs(ring).max()
    # the left microphone is reached first
    return np.array([out[:N], np.roll(out, round(0.001 * SR))[:N]])


def room(x, count=6):
    """Near surfaces and the room answer; the answer differs from one part of the bag to the next."""
    early_db, early_t60 = 5, .045
    wet = np.zeros((2, N))
    place = np.cumsum(np.exp(.5 * wobble(5))) * 60 / SR  # passes about 60 parts a second
    for k in range(count):
        hz, t, z = signal.stft(rng.standard_normal((2, SR // 4)), SR, nperseg=128)
        fade = amp(-60 * t / along(ROOM_DECAY, hz)[:, None]) + amp(early_db - 60 * t / early_t60)
        tail = signal.istft(z * fade * amp(along(ROOM_COLOUR, hz))[:, None], SR, nperseg=128)[1]
        # the answer starts 1 ms after the direct sound
        tail = np.pad(tail / np.linalg.norm(tail[0]), ((0, 0), (SR // 1000, 0)))
        away = np.abs((place - k + count / 2) % count - count / 2)
        share = np.cos(np.pi / 2 * np.minimum(away, 1))
        wet += signal.oaconvolve(x * share, tail, axes=1)[:, :N]
    return wet


def at_ports(pair):
    """Mix two signals to the likeness, balance and phase lead of the left and right microphones."""
    def turn(hz):
        return np.arccos(np.clip(along(MIC_LIKENESS, hz), -.98, .98)) / 2
    mid, side = filtered(pair, lambda hz: np.array([np.cos(turn(hz)), np.sin(turn(hz))]))
    half = np.array([[.5], [-.5]])

    def port(hz):
        return amp(half * along(MIC_BALANCE, hz)) * np.exp(1j * half * along(MIC_LEAD, hz))
    return filtered(np.array([mid + side, mid - side]), port)


def lowered(ears):
    """Low resonances take another path to the microphones once the bag sinks from chest to lap."""
    half = np.array([[.5], [-.5]])
    raised = filtered(ears, lambda hz: np.exp(1j * half * along(RAISED_LEAD, hz)))
    sunk = np.clip((np.arange(N) / SR - LOWERED_S) / LOWERING_S, 0, 1)
    return (1 - sunk) * raised + sunk * ears


def scene(snap_db=1.5, direct_db=-5.0, room_db=-5, snap_room_db=-9):
    """The bag, direct and through the room, over handling and quiet; snaps face the phone and are drier."""
    rustle = crackle() + squeak()
    cracks = amp(snap_db) * snaps() + pops()
    direct = amp(direct_db) * (rustle + cracks)
    reflected = room(amp(room_db) * rustle + amp(snap_room_db) * cracks)
    return lowered(at_ports(direct + reflected)) + bumps() + shifting() + background()


def record(dry):
    """Nothing sounds above TOP_HZ."""
    return filtered(dry, lambda hz: hz < TOP_HZ)


dry = scene()
out = record(dry)
digitize_waveform(out)
```